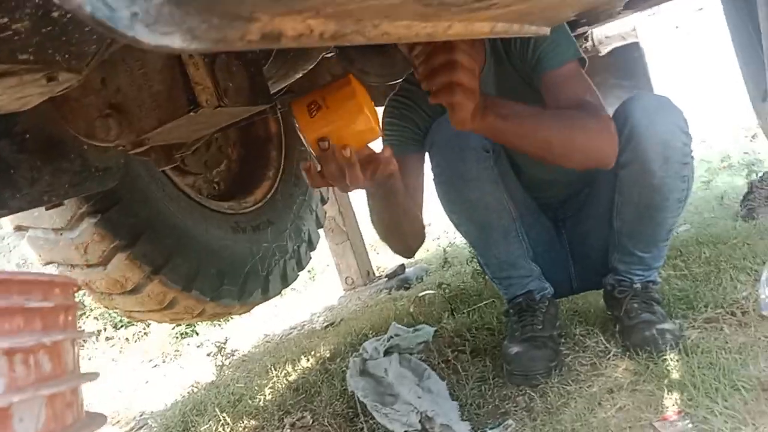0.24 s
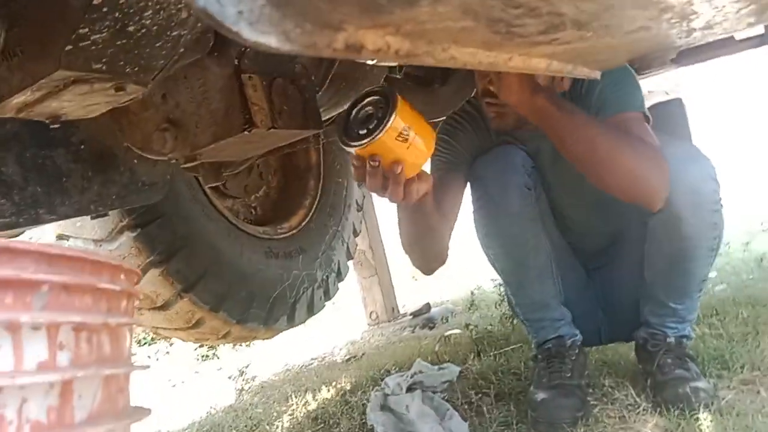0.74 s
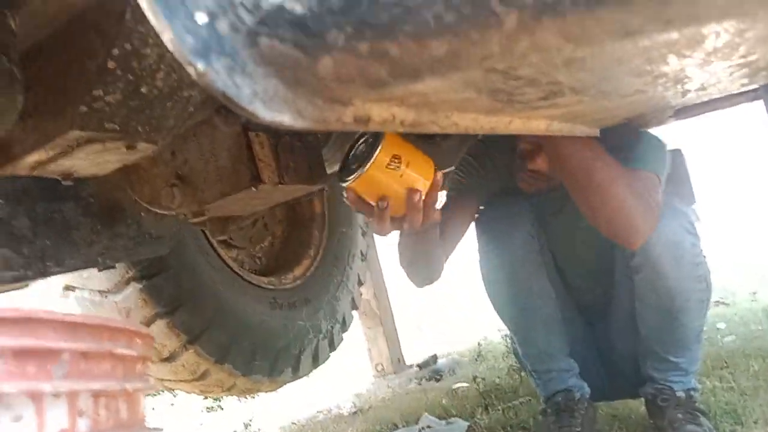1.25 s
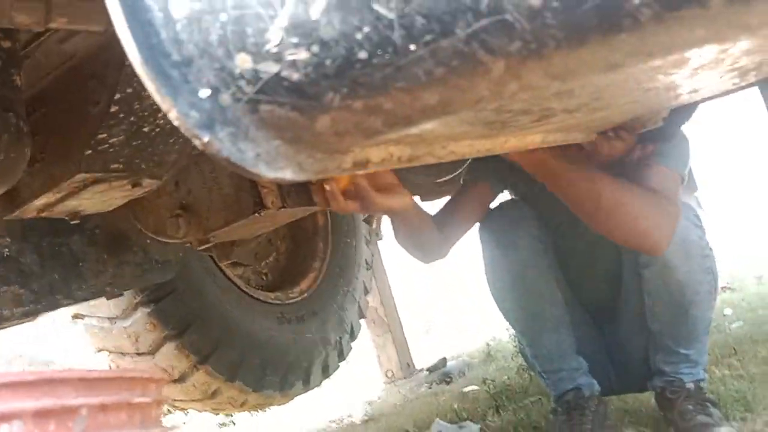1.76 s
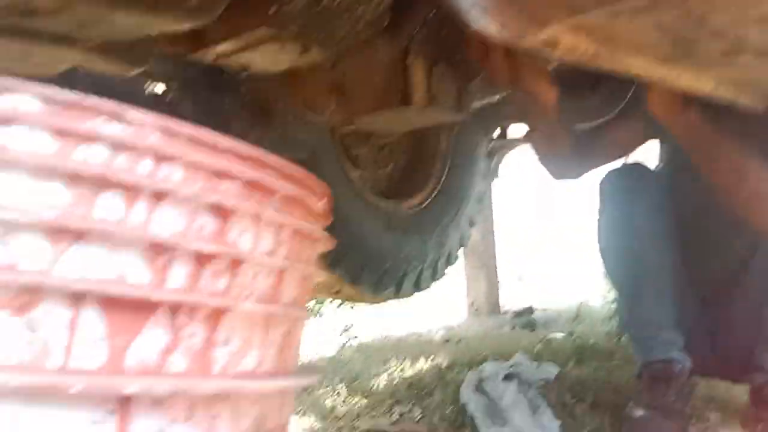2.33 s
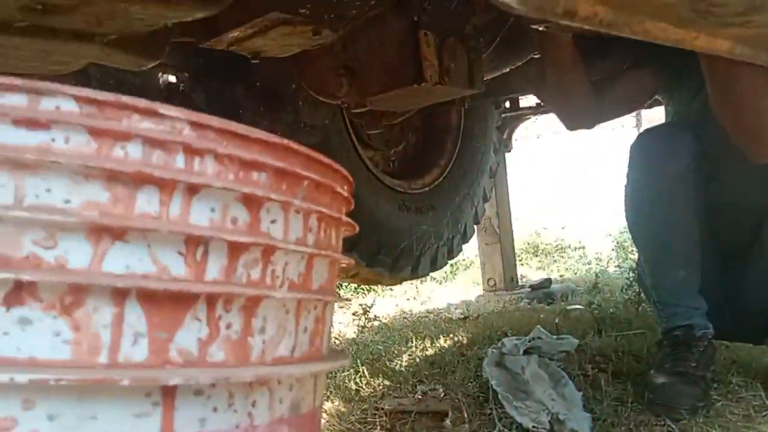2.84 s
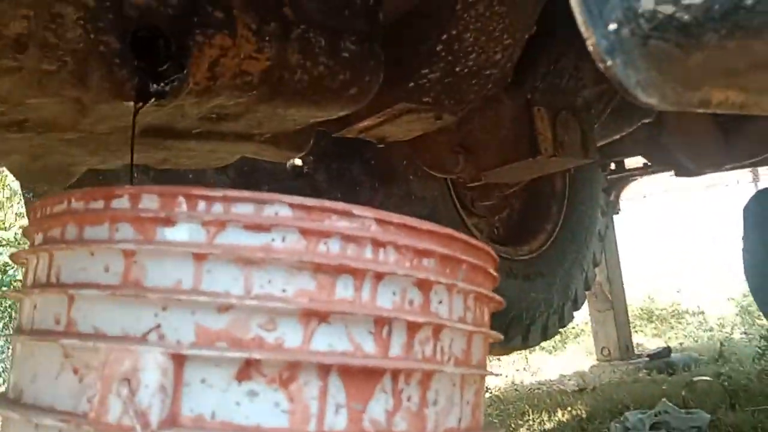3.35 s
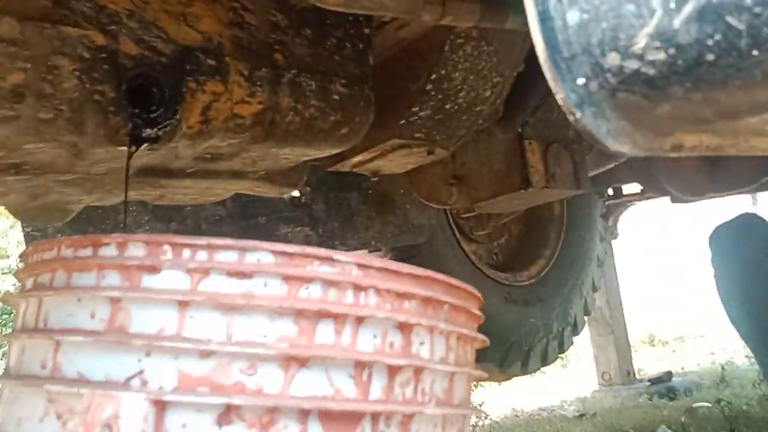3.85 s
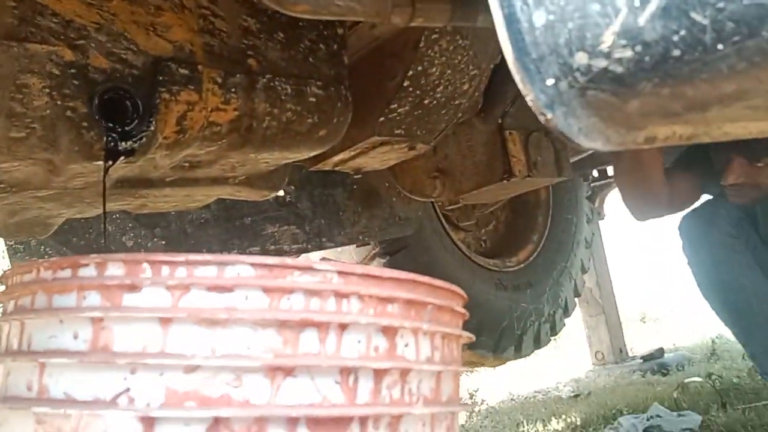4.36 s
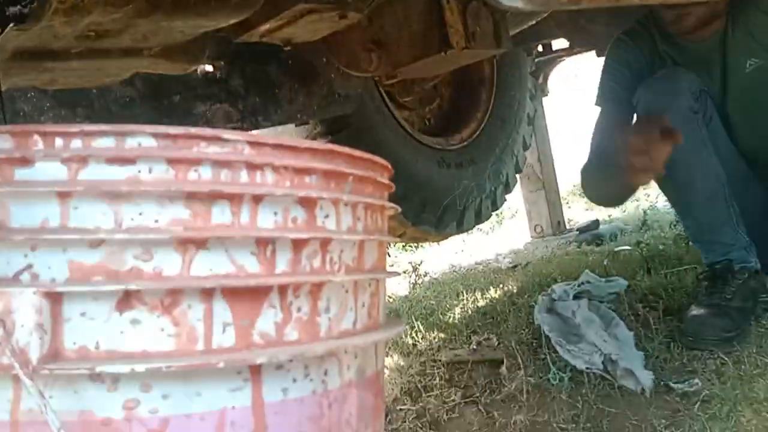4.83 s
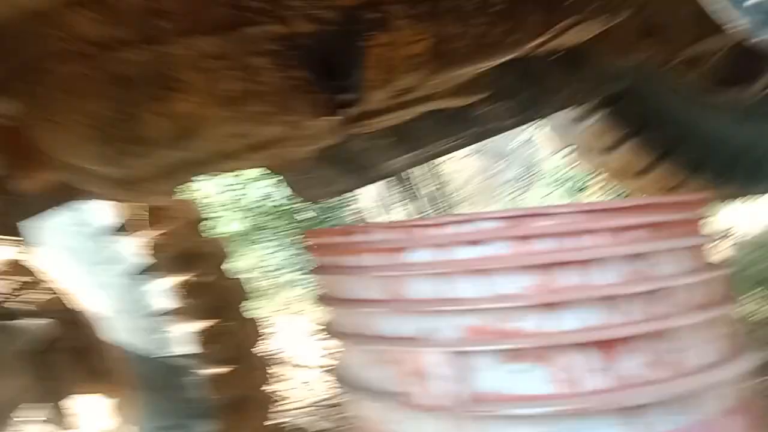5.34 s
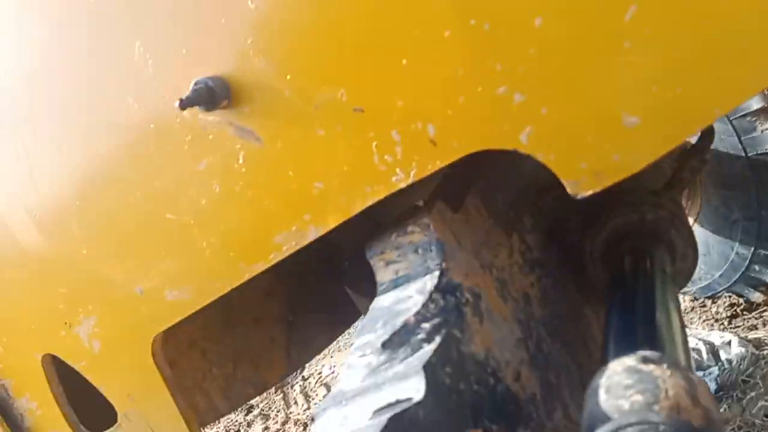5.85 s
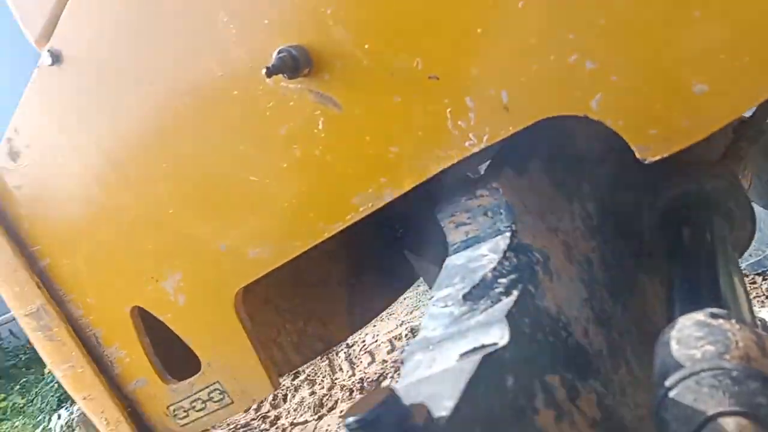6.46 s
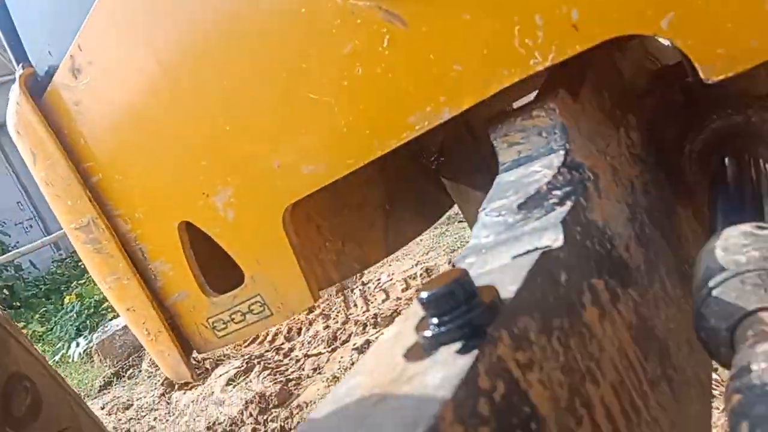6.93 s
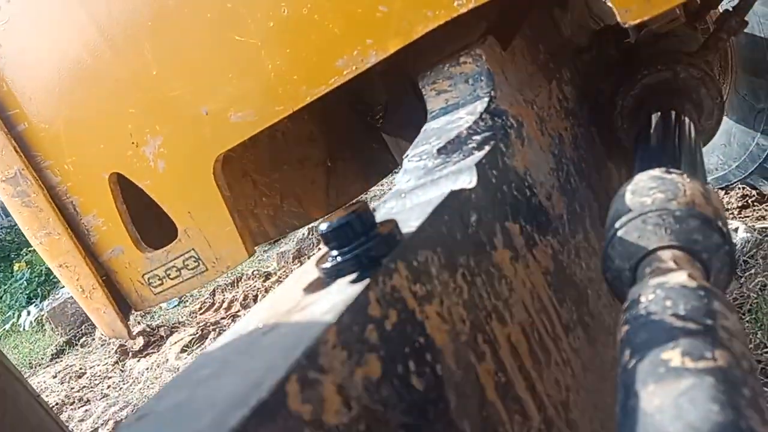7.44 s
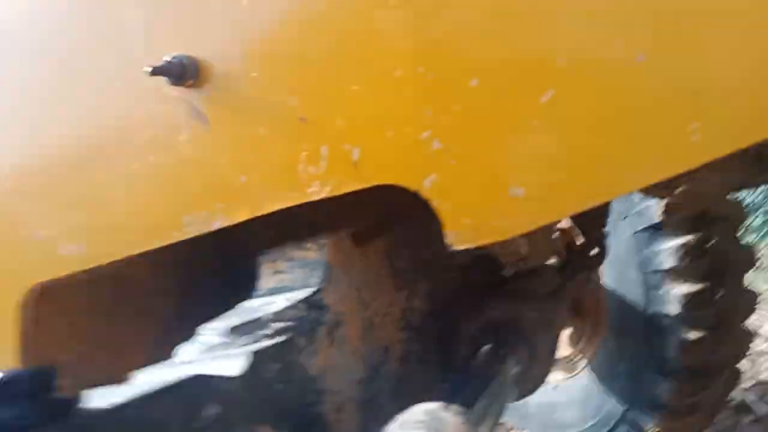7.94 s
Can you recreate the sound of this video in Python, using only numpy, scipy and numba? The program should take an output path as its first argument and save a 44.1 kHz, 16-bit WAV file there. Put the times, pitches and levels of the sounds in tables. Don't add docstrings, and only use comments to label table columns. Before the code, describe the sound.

Low wind rumbles on a phone microphone outdoors while a steel can clanks twice with a ringing tail, small parts tick, and a loud gust thumps at the end.

```python
import sys
import numpy as np
from scipy import signal
from scipy.fft import rfft, irfft
from scipy.io import wavfile
from scipy.ndimage import uniform_filter1d
from numba import njit

SR = 44100
rng = np.random.default_rng(int(sys.argv[2]) if len(sys.argv) > 2 else 0)


def generate_wav(sig):
    pcm = np.round(np.clip(np.atleast_2d(sig).T, -1, 1) * 32767).astype(np.int16)
    wavfile.write(sys.argv[1], SR, pcm)


def volts(x):
    e = np.asarray(x, float) / 20
    return 10 ** e


N = 361205

# time in seconds, strength in dB, how squarely the port faces it in dB.
WIND = [(0.0, -38.5, -3), (2.6, -36, -8), (2.74, -35, -3.5), (2.87, -29.5, -2), (2.92, -43, -7),
        (3.35, -36.5, -14.5), (4.29, -37.5, -16.5), (4.77, -40.5, -20), (5.0, -41.5, -14), (5.57, -37, -17),
        (5.84, -37.5, -40.5), (6.73, -40, -53), (7.0, -34, -20.5), (7.21, -40.5, -44.5), (7.75, -31.5, -13),
        (7.96, -36, -24), (8.0, -18.5, -17), (8.19, -26.5, -7)]
# time in seconds, depth in dB, half length in seconds.
LULLS = [(1.735, -12.5, 0.043), (3.61, -11.5, 0.02), (4.37, -21, 0.039), (4.55, -12.5, 0.034),
         (4.865, -18.5, 0.025), (5.08, -14, 0.043), (7.86, -18, 0.066), (8.11, -7, 0.025)]
# time in seconds, gain of the upper edge in dB, half length in seconds.
SWINGS = [
    (5.74, 22, 0.013),
    (5.97, 35, 0.12),
    (7.0, 8.5, 0.047),
]
# time in seconds, level in dB.
HAND_SWAY = [(0.0, -64), (2.39, -46.5), (3.85, -73.5), (7.78, -63), (8.19, -64)]
# time in seconds, peak in dB, pitch in Hz.
THUMPS = [(2.838, -23, 232), (2.868, -18.5, 149), (7.994, -17, 173), (8.003, -24, 235), (8.019, -26, 131),
          (8.036, -6.5, 191.4), (8.049, -12.5, 266), (8.057, -17, 268), (8.11, -19, 278.5),
          (8.1425, -21, 466), (8.167, -43, 583), (8.155, -20, 158), (8.165, -17.5, 194)]
# frequency in Hz, dB per Hz.
RUMBLE = [(35, -54.5), (60, -18.5), (88, -7), (129, -2), (172, -5), (190, -2.5), (230, -31.5), (300, -59)]
FLUTTER = [(215, -4.5), (280, 0), (370, -3.5), (450, -34)]
BUFFET = [(340, -14), (420, 3.5), (560, -2.5), (760, -35)]
HAND_PUSH = [(30, -46), (44, 0), (70, -14)]
PORT_HZ = 70
MIC_TOP_HZ = 8900

# time in seconds, peak in dB, crack in dB, crack t60 in seconds, attack in seconds.
CLINKS = [
    (0.983, -12, -17.5, 0.24, 0.0028),
    (1.3513, -15.5, -15, 0.21, 0.0014),
    (5.951, -26.5, -25.5, 0.021, 0.0065),
]
# frequency in Hz, level in dB, t60 in seconds.
CAN_FIRST = [(554, -10, .42), (988, -17, .42), (1356, -16.5, 1.65), (1563, -11, .24), (1677, -10, .17),
             (591, -10, .2), (1930, -12, .11), (2494, -18, .43), (3573, -10.5, .15), (1631, -17, .14),
             (4182, -20, .17), (4366, -20, .17), (1001, -22, .6), (5771, -22, .1)]
CAN_SECOND = [(600, -5, .085), (684, -14, .2), (992, -14.5, .4), (1346.4, -15, .7), (1567, -25, .22),
              (2353, -23, .23), (2560, -7, .1), (3074, -12, .16), (4183, -21, .13), (5060, -17, .09),
              (5766, -24, .12), (6519, -26, .2), (7036, -13, .07), (7811, -20, .07)]
PLUG = [(590, -7, 0.26), (980, -7, 0.16), (1355, -10, 0.17), (2500, -11, 0.099), (4190, -17, 0.2),
        (4460, -14, 0.077), (5900, -20, 0.12), (6520, -12, 0.095), (7740, -20, 0.1)]
FRAME_FIRST = [(511, -25.5, 0.18), (670, -21, .16), (1250, -17, 0.13), (1404, -20.5, 0.08),
               (1710, -17.5, .2), (2300, -20.5, 0.17), (2540, -15, .09)]
FRAME_SECOND = [(874, -15, 0.084), (1210, -21.5, .08), (1680, -19.5, .1), (2659, -10, 0.11),
                (3180, -17.5, .08), (3740, -18, 0.089), (4330, -23, 0.2)]
LONG_RING = 2
# frequency in Hz, dB per Hz.
CRACK = [(300, -8.5), (760, -11), (980, -10), (2400, -22.5), (3610, -13.5), (4950, -16.5), (7900, -24),
         (14300, -79.5)]
# time in seconds, peak in dB, pitch in Hz, t60 in seconds, relative treble in dB.
KNOCKS = [(0.9845, -11, 973, 0.077, -26), (1.013, -20, 1650, 0.082, -29), (1.354, -22.5, 990, 0.19, -32),
          (2.696, -29, 1070, 0.035, -33), (1.892, -25, 896, 0.027, -41), (2.681, -22, 980, 0.026, -27),
          (2.8333, -22, 980, 0.014, -10.5), (3.2229, -14, 950, 0.022, -16), (3.226, -37, 1390, 0.083, -30),
          (3.255, -40.5, 770, 0.14, -10), (5.735, -30, 1140, 0.048, -7.5), (5.972, -28.5, 620, 0.06, -10.5),
          (5.985, -28, 560, 0.039, -33), (6.005, -29, 550, 0.033, -19), (6.016, -34, 610, 0.039, -22),
          (7.0, -51.5, 590, 0.25, -25)]

# time in seconds, peak in dB, pitch in Hz.
TICKS = [(0.515, -34, 6170), (7.107, -37, 3330), (2.599, -50, 3180), (2.639, -44.5, 3330),
         (3.15, -49, 4200), (3.2883, -49, 3490), (3.3216, -46, 3320), (2.683, -41, 3190),
         (3.225, -31, 6260), (4.626, -48, 2250), (4.627, -49, 3330), (4.627, -52, 4710), (5.192, -49, 4460),
         (5.511, -58, 4950), (5.736, -34, 3240), (6.16, -45, 3800), (6.33, -58.5, 4810), (6.451, -47, 4080),
         (6.471, -52, 2710), (6.949, -43, 3820), (6.9506, -44, 4770), (6.945, -52.5, 2470),
         (7.237, -62, 5170), (7.257, -48, 2090), (5.514, -51.5, 2770), (5.6203, -41, 2156),
         (5.641, -45.5, 3600), (5.735, -29, 2500), (6.005, -46, 4130), (6.065, -41, 3800),
         (6.158, -37, 5300), (6.321, -53, 2040), (6.3386, -44.5, 3780), (6.443, -42, 3420),
         (6.701, -54, 5380), (6.98, -46, 3700), (7.0937, -26, 3560), (7.115, -39, 2620), (7.254, -40, 2470),
         (7.268, -52, 1770), (7.379, -57, 1560), (7.603, -36, 6520), (7.966, -47.5, 3330),
         (8.072, -46, 5250)]
# time in seconds, peak in dB, pitch in Hz.
SCUFFS = [(0.393, -38, 3300), (0.39, -39, 6540), (0.557, -45, 3040), (2.834, -43, 4460), (2.889, -32, 2700),
          (4.2276, -58, 3900), (4.275, -58, 3340), (5.308, -40, 2560), (5.317, -39, 3280),
          (5.382, -57, 5940), (6.006, -56, 4930)]
# time in seconds, peak
# in dB.
SNAPS = [(2.362, -35), (2.9685, -38), (3.2225, -26.5), (4.278, -39.5), (4.612, -38), (4.7932, -40),
         (5.01, -56), (5.2387, -43), (5.317, -30.5), (5.574, -32.5), (5.85, -44), (6.125, -50),
         (7.586, -39), (6.16, -40), (6.265, -55), (6.445, -52), (5.1422, -32.5), (5.171, -35),
         (5.197, -35.5), (5.564, -40), (6.01, -41.5), (6.074, -38.5), (6.123, -43), (6.331, -34.5),
         (6.5025, -36), (6.5775, -38.5), (6.7017, -41.5), (6.756, -40.5), (6.8164, -47.5), (6.8761, -43),
         (6.991, -34), (7.069, -36), (7.121, -44), (7.173, -41), (7.291, -40), (7.433, -43.5),
         (7.883, -38.5)]
TICK_WIDTH, SCUFF_WIDTH = 0.12, 0.88
TICK_T60_S, TICK_SHORTER_DB, TICK_LOWER = 0.097, -0.34, 0.32

SING_HZ = [2680, 3090, 3570, 2945, 3405, 3900, 3120, 2750, 10550]
# start in seconds, end in seconds, level in dB.
SQUEALS = [
    [(.26, .76, -58), (.76, .98, -53.5), (1.0, 1.15, -58), (1.22, 1.64, -53), (1.68, 1.86, -72)],
    [(.27, .48, -57.5), (.64, .98, -58.5), (1.24, 1.6, -57.5)],
    [(0.001, .2, -75), (.8, .98, -65), (1.4, 1.6, -73.5), (3.02, 3.16, -68.5)],
    [(5.832, 6.014, -57.5)],
    [(5.86, 6.05, -61), (6.45, 6.58, -68.5), (6.72, 6.92, -69.5)],
    [(5.844, 5.962, -64.5)],
    [(6.68, 6.926, -68.5)],
    [(6.286, 6.43, -64.5)],
    [(3.3, 3.34, -77)],
]
# start and end in
# seconds, pitch in Hz, level in dB, roughness as share of pitch.
GURGLES = [(0.554, 0.934, 942, -57, 0.64), (3.003, 3.203, 618, -57, 0.12), (3.03, 3.15, 820, -59.5, 0.18),
           (3.376, 3.46, 790, -60.5, 0.18), (3.465, 3.56, 872, -53, 0.28), (4.484, 4.606, 1040, -70, 0.16),
           (4.818, 4.92, 1250, -68, 0.092), (5.258, 5.33, 1317, -60, 0.15), (6.478, 6.57, 1286, -67, 0.17),
           (6.685, 6.717, 1270, -56.5, 0.065), (7.085, 7.137, 1336, -64, 0.22),
           (7.125, 7.22, 2630, -72, 0.071), (1.24, 1.32, 4420, -66, 0.05), (5.49, 5.575, 1077, -62, 0.093),
           (5.506, 5.586, 772, -60.5, 0.043), (5.741, 5.797, 1434, -51.5, 0.73),
           (5.783, 5.894, 1320, -54.5, 0.28), (5.966, 6.12, 1338, -54.5, 0.12),
           (6.177, 6.328, 1282, -51, 0.17), (6.81, 6.898, 2680, -63.5, 0.13),
           (6.895, 6.922, 1270, -53, 0.043), (7.005, 7.08, 1306, -52.5, 0.053),
           (7.161, 7.207, 1300, -56.5, 0.097), (7.371, 7.68, 2464, -60, 0.28),
           (7.35, 7.523, 1550, -59, 0.46), (7.521, 7.66, 1487, -55, 0.43),
           (7.665, 7.853, 1497, -57.5, 0.42), (7.541, 7.602, 3480, -64, 0.38),
           (7.633, 7.747, 3750, -71, 0.11), (7.799, 7.9, 3750, -74.5, 0.12),
           (7.757, 7.854, 4940, -71, 0.053), (1.898, 2.05, 1453, -59.5, 0.26),
           (1.899, 1.98, 954, -53, 0.41), (1.934, 2.015, 3290, -61, 0.14), (5.854, 5.933, 2580, -63, 0.04),
           (6.066, 6.121, 1740, -59, 0.064), (7.977, 8.196, 1350, -61, 0.12), (8.1, 8.192, 1750, -63, 0.14),
           (8.041, 8.194, 2850, -67.5, 0.062), (7.459, 7.727, 1073, -59.5, 0.12),
           (7.454, 7.67, 5300, -64.5, 0.06), (7.899, 8.188, 5240, -69, 0.088)]
# start and end in seconds, start and end pitch in Hz, level in dB.
CHIRPS = [
    (0.0, 0.117, 5520, 5460, -55.5),
    (0.186, 0.308, 5620, 5670, -59),
    (6.618, 6.947, 5860, 5690, -63.5),
    (6.892, 7.148, 5730, 5620, -66),
]
# start and end in seconds, start and end pitch in Hz, level in dB.
WHINES = [(0.001, 0.055, 8500, 8200, -64), (0.001, 0.018, 11000, 11000, -86),
          (0.3, 0.43, 11750, 11700, -85), (0.001, 0.06, 3500, 3500, -62), (7.088, 7.178, 3300, 3300, -75)]
# start and end in seconds, start and end pitch in Hz, level in dB.
SCRAPES = [(5.755, 5.8, 1600, 1390, -57), (5.915, 5.96, 1940, 2320, -64), (5.93, 5.95, 1280, 1200, -47),
           (6.065, 6.11, 4100, 3240, -56), (0.58, 0.718, 12400, 11000, -69),
           (5.847, 5.945, 3800, 3600, -64.5)]
# start and end in seconds, start and end pitch in Hz, level in dB.
HUMS = [
    (1.5, 2.4, 180, 182, -44.5),
    (6.25, 6.948, 100, 78, -43),
    (7.5, 7.8, 200, 216, -44.5),
]
SQUEAL_ROUGH, CHIRP_ROUGH, WHINE_ROUGH, SCRAPE_ROUGH = 0.029, 0.021, 0.024, 0.16
CHIRP_OCTAVE_DB = -34

# start and end in seconds, level in dB, tilt in dB per octave.
BRUSH = [(0.104, 0.205, -57, 5.5), (0.24, 0.29, -58.5, -1), (0.324, 0.374, -56, 0), (0.375, 0.444, -46, -5),
         (0.465, 0.565, -52.5, -2), (0.53, 0.768, -49, 3.5), (0.756, 0.858, -64, -3),
         (1.869, 2.024, -52.5, -0.5), (2.066, 2.142, -53.5, 3), (2.57, 2.614, -53.5, -8.5),
         (2.727, 2.794, -57.5, -3), (2.765, 2.83, -38.5, -12.5), (2.823, 2.883, -41, -5.5),
         (2.876, 2.934, -40.5, -5.5), (2.932, 2.995, -58, -7), (4.58, 4.712, -66.5, 0),
         (4.793, 4.837, -54.5, 7), (5.2, 5.292, -55, 6.5), (5.304, 5.345, -50, -2), (6.06, 6.093, -66, -6),
         (5.713, 5.754, -54.5, -5), (6.134, 6.213, -51, -0.5), (2.03, 2.077, -66, 3)]
# time in seconds, peak in dB.
CRACKLES = [(0.107, -52), (2.7364, -41), (2.7522, -46), (2.7797, -27), (2.788, -32), (2.806, -32),
            (2.834, -25), (2.861, -36), (2.888, -36), (2.901, -34), (2.931, -40), (5.827, -52),
            (6.001, -54), (6.067, -51)]
# frequency in Hz, dB per Hz.
CLOTH = [(500, -11), (1300, -9.5), (3200, -3), (5900, -3), (6900, 0), (8500, -4), (9420, -23.5),
         (15400, -31)]
CRACKLE_T60_S = 0.017

# time in seconds, nearness of the bucket in dB, breeze in the grass in dB.
YARD = [(0.0, -63.5, -62.5), (0.52, -66.5, -60), (0.98, -70, -62.5), (1.3, -54, -61), (1.62, -59, -70.5),
        (2.23, -65.5, -65.5), (2.62, -53, -66), (2.78, -43.5, -65), (3.03, -63.5, -65.5),
        (4.42, -67.5, -73.5), (5.57, -71, -72.5), (6.04, -63, -65.5), (6.52, -71, -70.5), (7.41, -70, -70),
        (7.53, -62, -66), (8.19, -58.5, -61.5)]
# time in seconds, change in dB, half length in seconds.
SWELLS = [(0.15, 4.5, 0.034), (0.92, -7, 0.06), (1.24, 6, 0.05), (1.7, -1, 0.14), (2.36, 7, 0.08),
          (2.6, 15.5, 0.019), (2.66, -1, 0.02), (3.3, 2, 0.061), (4.37, -5.5, 0.057), (4.66, 12.5, 0.089),
          (4.9, -1.5, 0.016), (5.1, -3.5, 0.03), (5.45, 1, 0.055), (5.68, 6, 0.024), (5.8, -3.5, 0.032),
          (6.35, -13, 0.028), (6.65, -13, 0.021), (7.35, -21, 0.035)]
# frequency in Hz, dB per Hz.
TRICKLE = [(350, -34.5), (600, -6.5), (873, -10), (1170, -10), (1310, -4.5), (1490, -6), (2200, -26.5),
           (3200, -56.5)]
RUSTLE = [(1060, -17), (1800, -11.5), (3100, -10.5), (3600, -11.5), (5000, -16), (6300, -16.5),
          (8190, -33.5), (11000, -82)]
HISS = [(3530, -45), (6000, -16), (6300, -24.5), (6540, 2.5), (7940, 2), (9120, -22), (9400, -45),
        (12200, -70.5)]
AIR = [(5290, -39.5), (9000, -21.5), (9550, -7.5), (11100, -8), (15500, -13)]
RUSTLE_NEAR_SHARE, RUSTLE_DB, AIR_DB = 0.16, -3.5, -94


def wind():
    level_db = curve(WIND, 1) + bumps(LULLS)
    edge_db = curve(WIND, 2) + bumps(SWINGS)
    out = volts(level_db) * patchy(RUMBLE, flicker_db=0.0, bins=1, frames=6, throb_db=2.0)
    out = signal.sosfilt(signal.butter(4, PORT_HZ, "high", fs=SR, output="sos"), out)
    out += volts(level_db + edge_db) * patchy(FLUTTER, flicker_db=3.5, bins=1, frames=6, throb_db=-0.5)
    buffet_db = level_db + 2.14 * edge_db - 0.5
    out += volts(buffet_db) * patchy(BUFFET, flicker_db=3.0, bins=1, frames=6, throb_db=1.0)
    out += volts(curve(HAND_SWAY, 1)) * patchy(HAND_PUSH, flicker_db=-3.5, bins=1, frames=6, throb_db=1.5)
    out += volts(level_db - 0.46 * edge_db - 35.0) * band_noise(N, 232.0, 83.0)
    t = np.arange(SR // 10) / SR
    for s, db, hz in THUMPS:
        swell = np.exp(-(t * hz / 0.57 - 1.4) ** 2)
        add(out, s - .5 / hz, volts(db) * np.sin(2 * np.pi * hz * t) * swell)
    return out


def clinks(crack):
    out, t, grip = np.zeros(N), np.arange(SR) / SR, walk(30)
    first_turn = 0
    struck = (CAN_FIRST + FRAME_FIRST, CAN_SECOND + FRAME_SECOND, PLUG)
    for strike, ((s, db, crack_db, t60, attack), modes) in enumerate(zip(CLINKS, struck)):
        places = rng.random(30)
        turns = places.copy()
        if strike == 0:
            first_turn = turns[LONG_RING]
        if strike == 1:
            gap = (int(s * SR) - int(CLINKS[0][0] * SR)) / SR
            turns[LONG_RING + 1] = first_turn + CAN_FIRST[LONG_RING][0] * gap + .5
        body = np.zeros(SR)
        for (hz, mode_db, mode_t60), place, turn in zip(modes, places, turns):
            waver_db = (1.5 + 5 * t) * grip[int(place * N / 2):][:SR]
            sway = .04 * grip[int(place * N / 3):][:SR]
            body += volts(mode_db + waver_db) * ring(t, hz, mode_t60, turn + sway)
        add(out, s, np.minimum(t / attack, 1) * volts(db) * body)
        short = t[:SR // 4]
        add(out, s, volts(crack_db) * np.minimum(short / attack / 0.66, 1) * blow(crack, s, short, t60))
    return out


def blow(crack, s, t, t60):
    piece = unit(crack[int(s * SR):][:len(t)] * fade(t, 0.11))
    piece = piece * np.sqrt(np.mean(fade(t, 0.024) ** 2)) / fade(t, 0.11)
    dull = signal.sosfiltfilt(signal.butter(8, MIC_TOP_HZ, fs=SR, output="sos"), piece)
    body = signal.sosfiltfilt(signal.butter(2, 3800, fs=SR, output="sos"), piece)
    instant = (piece - dull) * volts(11.5) * fade(t, 0.028)
    return body * fade(t, t60) + (dull - body) * fade(t, 0.42 * t60) + instant


def knocks(crack):
    out, t = np.zeros(N), np.arange(SR // 4) / SR
    for s, db, hz, t60, treble_db in KNOCKS:
        tail = band_noise(len(t), hz, .45 * hz) * fade(t, 2.1 * t60)
        splash = volts(treble_db) * blow(crack, s, t, 0.15)
        hit = ring(t, hz, t60, 0) + volts(-13.0) * tail + splash
        add(out, s, volts(db) * np.minimum(t / 0.0024, 1) * hit)
    return out


def ticks(hiss, air):
    out, t = np.zeros(N), np.arange(SR // 4) / SR
    rise = (1 - np.exp(-t / 0.00059)) ** 2
    contacts = [(*r, TICK_WIDTH) for r in TICKS] + [(*r, SCUFF_WIDTH) for r in SCUFFS]
    for s, db, hz, share in contacts:
        t60 = TICK_T60_S * volts(TICK_SHORTER_DB * (db + 45.5)) * (3500 / hz) ** TICK_LOWER
        burst = band_noise(len(t), hz, hz * share)
        tone = .5 * np.sin(2 * np.pi * hz * t)
        add(out, s - .001, volts(db - 5.5) * rise * fade(t, t60) * (burst + tone))
    for s, db in SNAPS:
        i = int(s * SR)
        snap = unit(hiss[i:i + len(t)]) * fade(t, 0.052)
        snap += volts(-23.5) * air[i:i + len(t)] * fade(t, 0.027)
        add(out, s - .001, volts(db - 9.5) * rise * snap)
    return out


def squeals():
    out, chatter, drift = np.zeros(N), walk(45), walk(12)
    spells = [(a, b, hz, hz, db, SQUEAL_ROUGH) for hz, rows in zip(SING_HZ, SQUEALS) for a, b, db in rows]
    spells += [(a, b, hz, hz, db, rough) for a, b, hz, db, rough in GURGLES]
    for a, b, hz0, hz1, db in CHIRPS:
        for k in (1, 2):
            spells.append((a, b, k * hz0, k * hz1, db + (k - 1) * CHIRP_OCTAVE_DB, CHIRP_ROUGH / k))
    spells += [(*r, WHINE_ROUGH) for r in WHINES]
    spells += [(*r, SCRAPE_ROUGH) for r in SCRAPES + HUMS]
    for k, (start, end, hz0, hz1, db, rough) in enumerate(spells):
        t, gate = window(start, end, 0.012 + 0.055 * (end - start))
        own = slice(SR // 16 * k, SR // 16 * k + len(t))
        span = max(int(SR / (rough * hz0)), 1)
        smear = uniform_filter1d(uniform_filter1d(rng.standard_normal((2, SR)), span), span)[:, :len(t)]
        pitch = np.interp(t, t[[0, -1]], [hz0, hz1]) * (1 + 0.004 * drift[own])
        phase = 2 * np.pi * np.cumsum(pitch) / SR
        line = (0.86 + unit(smear[0])) * np.sin(phase) + unit(smear[1]) * np.cos(phase)
        add(out, start, gate * volts(db + 2.2 * chatter[own]) * unit(line))
    return out


def brushes():
    cloth = patchy(CLOTH, flicker_db=3.5, bins=8, frames=6, throb_db=-1.5)
    cloth = cloth * volts(0.54 * walk(9.2) + 1.36 * walk(200))
    out = np.zeros(N)
    for start, end, db, tilt_db in BRUSH:
        t, gate = window(start, end, 0.01 + 0.22 * (end - start))
        f = np.arange(len(t) // 2 + 1) * SR / len(t) + 300
        spectrum = rfft(cloth[int(start * SR):][:len(t)])
        piece = irfft(spectrum * volts(tilt_db * np.log2(f / 3000)), len(t))
        add(out, start, volts(db) * gate * unit(piece))
    t = np.arange(SR // 20) / SR
    for s, db in CRACKLES:
        grain = np.minimum(t / 0.0019, 1) * fade(t, CRACKLE_T60_S) * unit(cloth[int(s * SR):][:len(t)])
        add(out, s - .001, volts(db - 14.0) * grain)
    return out


def yard(hiss, air):
    near_db, breeze_db = curve(YARD, column=1), curve(YARD, column=2)
    out = volts(near_db) * patchy(TRICKLE, flicker_db=7.5, bins=2, frames=8, throb_db=1.5)
    rustle_db = breeze_db + RUSTLE_NEAR_SHARE * (near_db - breeze_db) + RUSTLE_DB
    out += volts(rustle_db) * patchy(RUSTLE, flicker_db=7.0, bins=3, frames=7, throb_db=3.0)
    out += volts(breeze_db + bumps(SWELLS)) * hiss
    return out * volts(0.24 * bumps(LULLS)) + volts(AIR_DB) * air


def patchy(spectrum, flicker_db, bins, frames, throb_db):
    hz, db = np.transpose(spectrum)
    f, t, z = signal.stft(rng.standard_normal(N), SR, nperseg=1024, noverlap=768)
    field = rng.standard_normal(z.shape)
    for size, axis in ((bins, 0), (frames, 1), (frames, 1)):
        field = uniform_filter1d(field, size, axis=axis)
    colour_db = np.interp(np.log(f + 1), np.log(hz), db, -200, -200)[:, None]
    z = z * volts(colour_db + flicker_db * unit(field))
    noise = signal.istft(z, SR, nperseg=1024, noverlap=768)[1][:N]
    return unit(noise * volts(throb_db * walk(60)))


@njit
def svf(x, hz, width):
    y, b, l = np.empty(len(x)), 0., 0.
    g, k = np.tan(np.pi * hz / SR), width / hz
    for i in range(len(x)):
        v = (b + g * (x[i] - l)) / (1 + g * (g + k))
        b, l, y[i] = 2 * v - b, l + 2 * g * v, k * v
    return y


def band_noise(length, hz, width):
    x = rng.standard_normal(length)
    for _ in range(3):
        x = svf(x, float(hz), float(width))
    return unit(x)


def walk(rate):
    k = int(SR / rate)
    steps = np.repeat(rng.standard_normal(N // 200)[:N // k + 1], k)
    return 1.58 * uniform_filter1d(uniform_filter1d(steps, k), k)[:N]


def ring(t, hz, t60, turn):
    return np.sin(2 * np.pi * (hz * t + turn)) * fade(t, t60)


def fade(t, t60):
    return np.exp(-np.log(1000) * t / max(t60, .004))


def window(start, end, edge):
    t = np.arange(min(int((end + edge - start) * SR), N - int(start * SR))) / SR
    return t, np.sin(np.pi / 2 * np.clip(np.minimum(t, (t[-1] - t) / 2) / edge, 0, 1)) ** 2


def bumps(rows):
    return sum(db * np.exp(-((np.arange(N) / SR - s) / half) ** 2) for s, db, half in rows)


def curve(table, column):
    rows = np.array(table, float)
    return np.interp(np.arange(N) / SR, rows[:, 0], rows[:, column])


def unit(x):
    return x / np.sqrt(np.mean(x ** 2))


def add(out, s, x):
    i = int(s * SR)
    out[i:i + len(x)] += x[:N - i]


def scene():
    crack = patchy(CRACK, flicker_db=4.5, bins=4, frames=20, throb_db=0.6)
    hiss = patchy(HISS, flicker_db=4.5, bins=4, frames=3, throb_db=3.0)
    air = patchy(AIR, flicker_db=2.0, bins=8, frames=3, throb_db=5.0)
    mix = wind() + yard(hiss, air) + brushes()
    mix += clinks(crack) + knocks(crack) + ticks(hiss, air) + squeals()
    return mix[None] * np.minimum(np.arange(N, 0, -1) / 256, 1)


def top_cut(x):
    return signal.sosfilt(signal.butter(12, 15690, fs=SR, output="sos"), x)


def record(dry):
    return top_cut(dry)


dry = scene()
out = record(dry)
generate_wav(out)
```